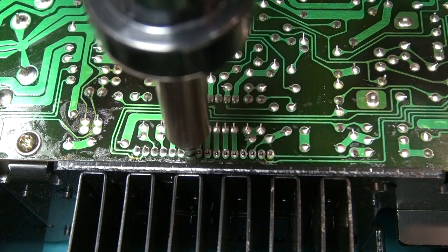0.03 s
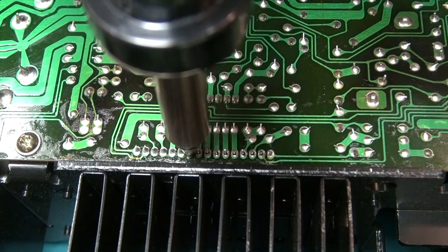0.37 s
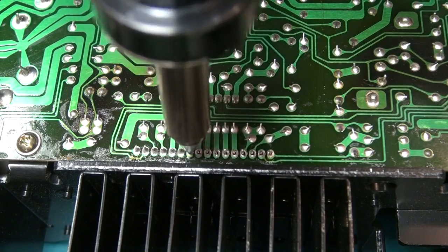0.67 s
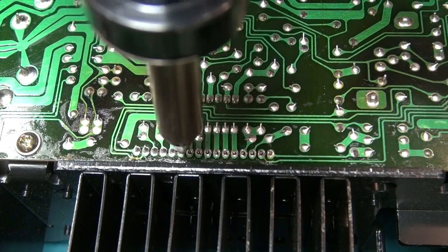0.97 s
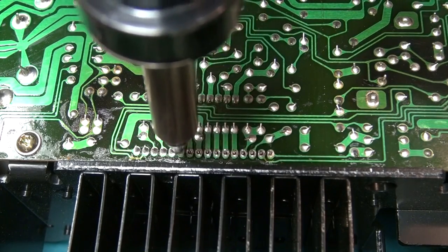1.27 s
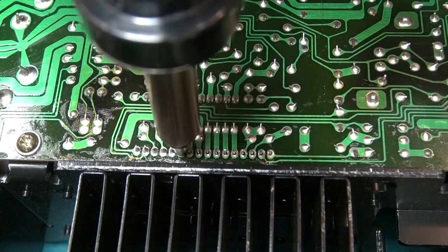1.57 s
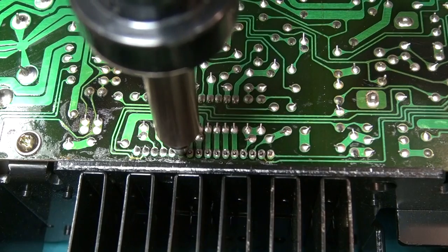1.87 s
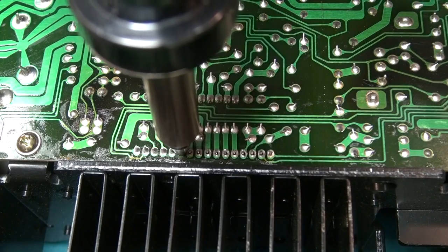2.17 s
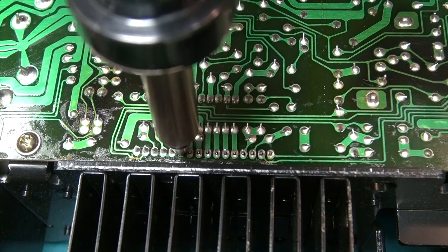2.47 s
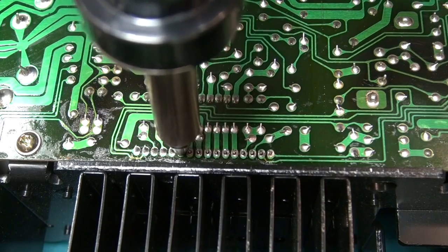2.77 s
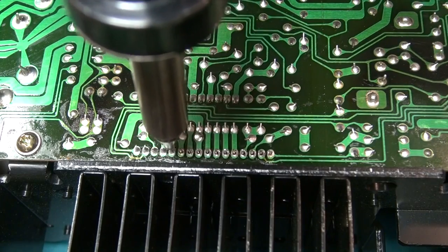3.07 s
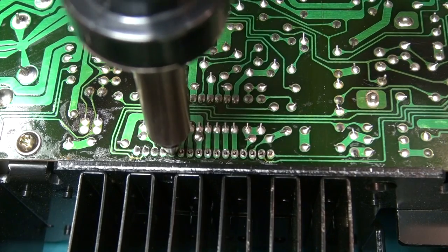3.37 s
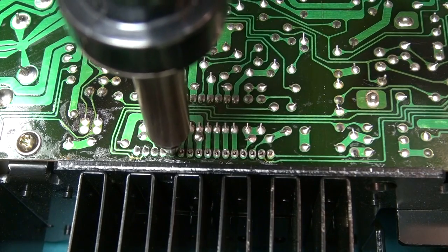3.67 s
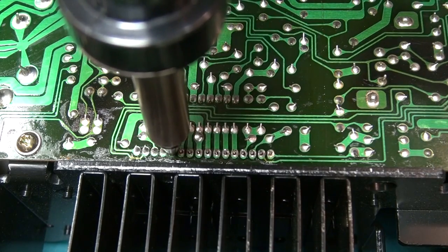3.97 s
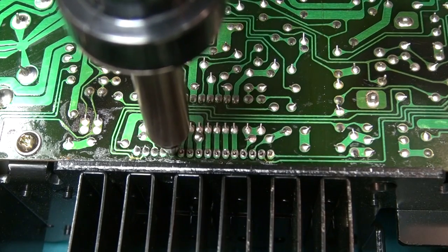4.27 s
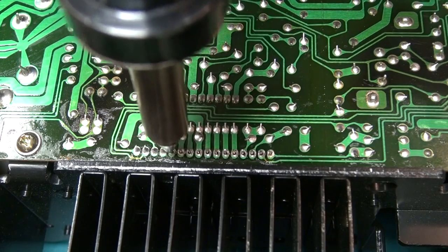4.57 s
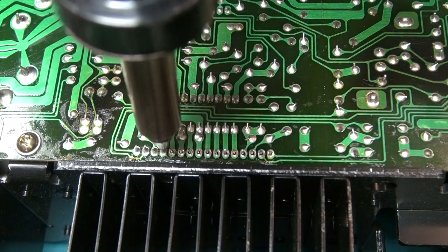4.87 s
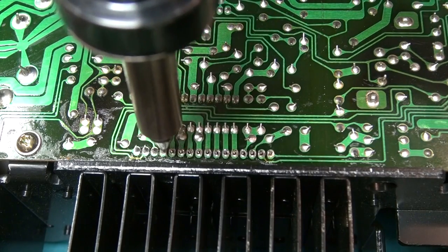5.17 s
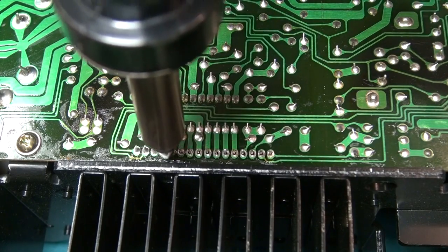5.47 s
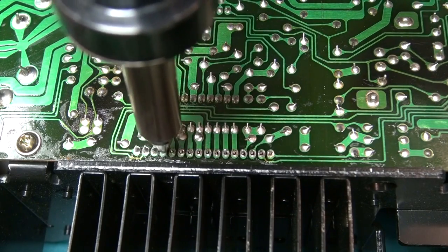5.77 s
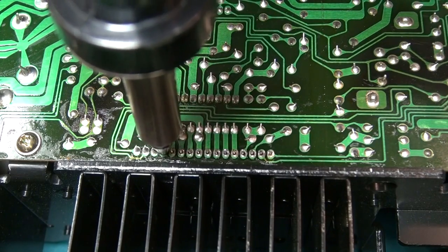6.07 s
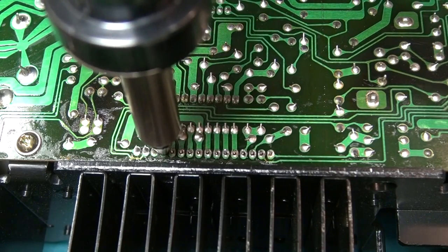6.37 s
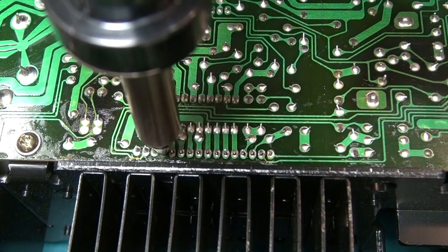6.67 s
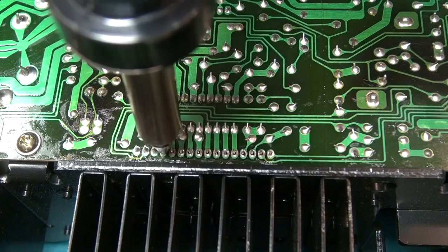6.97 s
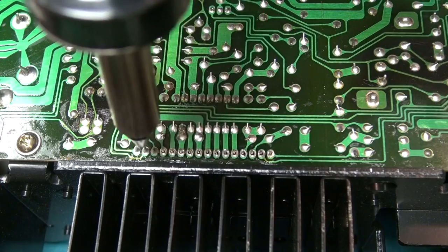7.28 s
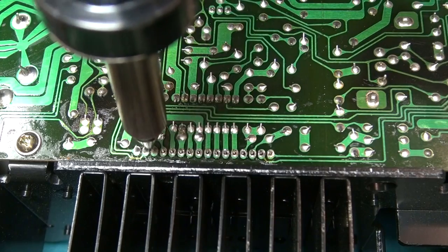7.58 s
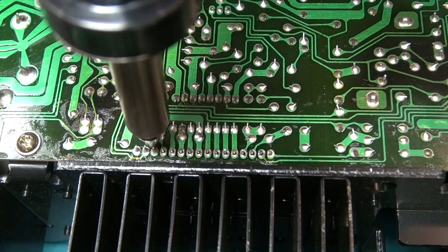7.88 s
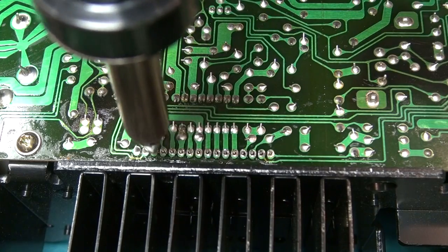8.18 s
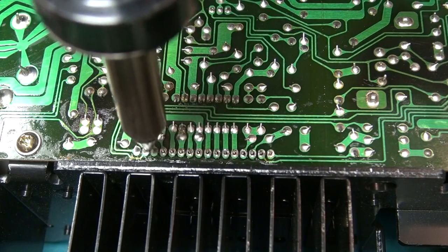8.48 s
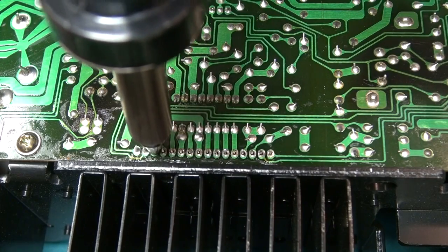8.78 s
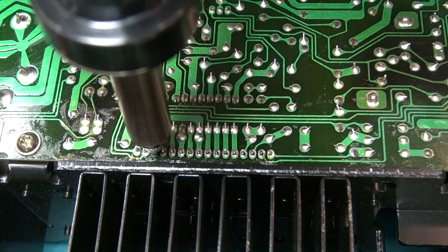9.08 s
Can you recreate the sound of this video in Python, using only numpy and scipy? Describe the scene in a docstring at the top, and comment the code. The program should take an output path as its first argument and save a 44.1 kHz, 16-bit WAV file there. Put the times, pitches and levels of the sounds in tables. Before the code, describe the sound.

A desoldering gun's pump buzzes in four short bursts over a humming fan, its nozzle tapping and scraping on a circuit board.

```python
"""A vacuum desoldering gun works on a circuit board, close up and in stereo, over a humming fan.
The trigger clicks and a diaphragm pump runs up, buzzing, its valves puffing. The nozzle seals and the
pump labours against the vacuum; on release it stops with a last stroke and a faint hiss. Four such
bursts come, near 0.3, 2.4, 4.2 and 6.7 s. Each ducks the gain, which creeps back up while the nozzle
bumps and scrapes from pin to pin. At the end the nozzle slips onto a pin with a hollow knock."""
import sys
import numpy as np
from scipy import signal
from scipy.fft import rfft, irfft
from scipy.io import wavfile
from scipy.ndimage import uniform_filter1d

SR = 44100
rng = np.random.default_rng(int(sys.argv[2]) if len(sys.argv) > 2 else 0)


def inscribe(sig):
    """Save sig as 16-bit PCM at rate SR to the path in sys.argv[1].

    A 1-D sig is mono; a 2-D sig holds one channel per row.
    Samples are clipped to [-1, 1] before scaling.
    """
    pcm = np.round(np.clip(np.atleast_2d(sig).T, -1, 1) * 32767)
    wavfile.write(sys.argv[1], SR, pcm.astype(np.int16))


N = 403068
T = np.arange(N) / SR
FFT_SIZE = 16384
HZ = np.maximum(np.arange(FFT_SIZE // 2 + 1) * SR / FFT_SIZE, 1)


def from_db(db):
    """Decibels to gain."""
    return 10 ** (np.asarray(db) / 20)


def unit_rms(x):
    """Scale to unit power."""
    return x / np.sqrt(np.mean(np.abs(x) ** 2) + 1e-20)


def noise():
    """White noise."""
    return rng.standard_normal(N)


def drift(rate, t=T):
    """A random wobble that glides to a new value rate times a second."""
    return np.interp(t * rate, np.arange(8192), rng.standard_normal(8192))


def over_hz(rows):
    """One curve over log frequency for each column after the first."""
    hz, *columns = np.transpose(rows)
    return [np.interp(np.log(HZ), np.log(hz), column) for column in columns]


def causal(gain):
    """Minimum-phase response with these gains: it rings only after it is struck."""
    cepstrum = irfft(np.log(gain))
    half = len(cepstrum) // 2
    cepstrum[1:half] *= 2
    cepstrum[half + 1:] = 0
    return np.exp(rfft(cepstrum))


def eq(points):
    """Response of an EQ curve drawn through (Hz, dB) points."""
    return causal(from_db(over_hz(points)[0]))


def colour(points):
    """An EQ curve scaled to unit power."""
    return unit_rms(eq(points))


def resonances(modes):
    """Unit-power response of parallel resonators, each (Hz, width in Hz, dB)."""
    return unit_rms(sum((-1) ** k * from_db(db) / (1 + 1j * (HZ ** 2 - hz ** 2) / (HZ * width))
                        for k, (hz, width, db) in enumerate(modes)))


def scatter(decay_s):
    """Unit-power response of dense, dying reflections."""
    return unit_rms(rfft(rng.standard_normal(FFT_SIZE) * np.exp(-T[:FFT_SIZE] / decay_s)))


def through(x, response):
    """Filter a sound with a frequency response."""
    lead = FFT_SIZE // 8
    return signal.oaconvolve(x, np.roll(irfft(response), lead))[lead:lead + N]


def strikes(rows, decay_s):
    """Envelope that jumps at each (s, dB) and dies away."""
    power = np.zeros(N)
    for s, db in rows:
        power[int(s * SR)] += from_db(db) ** 2
    return np.sqrt(signal.lfilter([1], [1, -np.exp(-2 / (decay_s * SR))], power + 1e-18))


def swells(rows):
    """Envelope with a smooth bell at each (centre s, half length s, dB)."""
    out = np.zeros(N)
    for s, half, db in rows:
        near = slice(max(int((s - 3 * half) * SR), 0), int((s + 3 * half) * SR))
        out[near] += from_db(db) * np.exp(-((T[near] - s) / half) ** 2)
    return out


def room(x, wet_db=-22, decay_s=0.034):
    """Stereo reflections of a small, fairly dead workshop."""
    return from_db(wet_db) * np.array([through(x, scatter(decay_s)) for side in range(2)])


# The fan's rush of air. Each row: frequency in Hz, relative level in dB.
FAN_AIR = [(20, -24), (60, -9), (150, -8), (220, -7.5), (500, -9), (850, -6), (1100, -8.5), (2500, -17.5),
           (3600, -22.5), (5300, -23.5), (8000, -33), (10000, -42), (13000, -41.5), (16000, -54)]
# Resonances of its duct. Each row: frequency in Hz, width in Hz, relative level in dB.
FAN_DUCT = [(155, 2.8, -20.5), (348, 40, -0.5), (398, 38, -1), (604, 41, -8), (720.5, 45, -1),
            (771.5, 45, -4)]
# Its motor hum. Each row: frequency in Hz, relative level in dB.
FAN_TONES = [(156.1, -69), (387.6, -63), (721.4, -71), (839.8, -64.5), (1680, -74.5), (2740, -75.5),
             (7160, -107), (11063, -102)]
def fan(air_db=-54, duct_db=-53, tones_db=2, whine_db=-87, whine_hz=11900):
    """The steady bed: rushing air, a resonant duct, motor tones and a thin, wandering whine."""
    def sine(hz):
        return np.sqrt(2) * np.sin(2 * np.pi * np.cumsum(hz) / SR)

    air = from_db(air_db) * through(noise(), colour(FAN_AIR))
    duct = from_db(duct_db) * through(noise(), resonances(FAN_DUCT))
    tones = sum(from_db(db + tones_db) * sine(hz + 1.12 * drift(8)) for hz, db in FAN_TONES)
    whine = from_db(whine_db) * (1 + 0.23 * drift(300)) * sine(whine_hz + 110 * drift(3))
    return air + duct + tones + whine


def fan_hiss(level_db=-68):
    """The part of the fan's hiss that reaches only the left side."""
    tone = colour([(60, -22), (700, 1), (2500, 5.5), (6000, -5), (12000, -14.5), (16000, -50)])
    return from_db(level_db) * through(noise(), tone) * [[1], [0]]


# The nozzle meets pins and board. Each row: start in seconds, thud level in dB, click level in dB.
BUMPS = [(0.085, -74, -55), (1.221, -38.5, -43.5), (1.359, -46, -61), (1.498, -48, -61),
         (3.118, -38.5, -42), (3.311, -43.5, -50.5), (4.144, -65, -55), (4.96, -48, -61), (5.245, -42, -54),
         (5.37, -45, -54), (7.499, -47, -52.5), (7.683, -63, -50.5), (7.816, -44.5, -53),
         (7.955, -48, -51.5), (8.029, -61, -50.5), (8.233, -41, -43), (8.56, -33, -38.5)]
def nozzle_touches(settle_s=0.02723, nudges_per_s=1.5, nudge_db=-62):
    """Rows like BUMPS: each bump, its softer settling, and random nudges from an unsteady hand."""
    settles = [(s + settle_s, thud_db - 9.5, click_db - 16) for s, thud_db, click_db in BUMPS]
    gaps, strengths = rng.random((40, 2)).T
    times = np.cumsum(.5 + gaps) / nudges_per_s
    levels_db = nudge_db + 10 * (strengths - .5)
    nudges = [(s, db, db - 24) for s, db in zip(times, levels_db) if s < T[-1]]
    return BUMPS + settles + nudges


# Low modes of the board in its chassis.
# Each row: frequency in Hz, relative level in dB, seconds to fall by 60 dB.
BOARD_MODES = [(62, -7, 0.33), (94, -5.5, 0.3), (102.7, -4.5, 0.16), (135, -1, 0.35), (165, 2.5, 0.18),
               (214.3, -7.5, 0.3), (287, -5, 0.18)]
def board_thuds(touches, attack_s=0.0051):
    """Each touch sets the board thudding, in a fresh mix of its modes."""
    t = T[:SR // 2]
    attack = 1 - np.exp(-t / attack_s)
    out = np.zeros(N + len(t))
    for s, thud_db, _ in touches:
        ring = np.zeros(len(t))
        for hz, db, t60 in BOARD_MODES:
            fade = from_db(db + rng.normal(0, 1) - 60 * t / t60)
            ring += fade * np.sin(2 * np.pi * (hz * t + rng.random()))
        out[int(s * SR):][:len(t)] += from_db(thud_db) * attack * ring
    return out[:N]


# Tone of a click on a pin. Each row: frequency in Hz, relative level in dB.
PIN_CLICK = [(150, -4), (400, 1.5), (750, 12.5), (1100, -8.5), (1800, -4), (3000, 2.5), (4000, -5.5),
             (5600, -8), (8000, -19), (12000, -28), (16000, -65)]
# Ring of nozzle and pins. Each row: frequency in Hz, width in Hz, relative level in dB.
PIN_RING = [(690, 400, 11), (1560, 69, 14), (1717, 36, 14), (2360, 28, -10), (2740, 100, -13),
            (3100, 170, -3), (5360, 120, -18)]
def pin_clicks(touches, ring_db=-1, tail_db=-8):
    """Metal taps metal: a sharp click with a softer tail and a short ring."""
    hits = [(s, click_db) for s, _, click_db in touches]
    envelope = strikes(hits, decay_s=0.0067) + from_db(tail_db) * strikes(hits, decay_s=0.029)
    return through(envelope * noise(), colour(PIN_CLICK) + from_db(ring_db) * resonances(PIN_RING))


# Slides of the nozzle. Each row: centre in seconds, half length in seconds, level in dB.
SCRAPES = [(3.229, .02, -57.5), (5.42, 0.042, -54), (5.57, .025, -61), (7.84, 0.01, -53.5),
           (7.938, 0.019, -54), (8.035, 0.014, -60)]
# Tone of a slide. Each row: frequency in Hz, relative level in dB.
SCRAPE_TONE = [(600, -4), (1800, 2.5), (3000, 3), (5000, -5), (8000, -9), (12000, -25), (16000, -40)]
def solder_scrapes():
    """The nozzle drags over solder with a gritty hiss."""
    grit = noise() * from_db(3 * drift(400))
    return through(swells(SCRAPES) * grit, colour(SCRAPE_TONE))


# The closing knock. Each row: start in seconds, level in dB.
SLIP = [(8.626, -30)]
# Its hollow ring. Each row: frequency in Hz, width in Hz, relative level in dB.
SLIP_RING = [(855, 170, 6.5), (1500, 190, 3.5), (1760, 90, -3), (2240, 160, -1), (3370, 630, -16),
             (5700, 220, -11.5), (8050, 550, -22.5)]
def nozzle_slip():
    """The nozzle slips onto a pin with one hard, hollow knock."""
    return through(strikes(SLIP, decay_s=0.0073) * noise(), resonances(SLIP_RING))


# Cues for trigger and pump. Each row: press, nozzle seal, release and motor stop in seconds,
# free crank speed in turns a second, run-up time constant in seconds,
# relative levels of the trigger and of the last stroke in dB.
BURSTS = [(.2747, .4662, .5872, .598, 67, .033, -24.5, -24),
          (2.421, 2.5991, 2.7222, 2.731, 67, .058, -26.5, -21),
          (4.1801, 4.3583, 4.5386, 4.547, 66.6, .056, -28, -23),
          (6.7277, 6.9066, 7.0205, 7.037, 66.8, .056, -27, -24)]
# Resonances of the switch.
# Each row: frequency in Hz, width in Hz, relative levels in dB on closing and on opening.
SWITCH_MODES = [(2500, 520, -3.5, -8), (3630, 300, -1, -1.5), (4720, 300, 3.5, -51), (5640, 470, -3, 0.5),
                (6350, 270, -0.5, 1), (7350, 270, -1, -7), (8670, 960, -21, -16), (12000, 780, -20, -32)]
def trigger(snap_db=8, chatter_db=-12, take_up_s=.013, take_up_db=-26):
    """The lever touches the switch, which snaps shut and chatters; it opens with a different ring."""
    presses = [(on, db) for on, *_, db, last_db in BURSTS]
    presses += [(s - take_up_s, db + take_up_db) for s, db in presses]
    releases = [(off, db) for on, sealed, off, *_, db, last_db in BURSTS]
    spring_chatter = from_db(chatter_db) * strikes(presses, decay_s=0.0056)
    closing = (strikes(presses, decay_s=0.00064) + spring_chatter) * noise()
    opening = strikes(releases, decay_s=0.0022) * noise()
    closing_ring = resonances([(hz, width, db) for hz, width, db, _ in SWITCH_MODES])
    opening_ring = resonances([(hz, width, db) for hz, width, _, db in SWITCH_MODES])
    grip = eq([(8000, -1.5), (13000, -3), (15000, -20)])   # the handle muffles the very top
    clicks = through(closing, grip * closing_ring) + through(opening, grip * opening_ring)
    return from_db(snap_db) * clicks


def crank_motion(start_lag_hz=25.85, vacuum_sag_hz=8.3, sag_s=.05, run_down_s=.07, seal_s=0.063):
    """The motor runs up, sags under vacuum and runs down: angle in turns; drive, vacuum, pace 0-1."""
    turns, drive, vacuum, pace = np.zeros((4, N))
    for on, sealed, off, stop, free_hz, run_up_s, *_ in BURSTS:
        now = T >= on
        t = T[now]
        since_stop = np.clip(t - stop, 0, 1)
        coasting = np.exp(-since_stop / run_down_s)
        unloaded_hz = free_hz - start_lag_hz * np.exp(-(t - on) / run_up_s)
        load = 1 - np.exp(-np.maximum(t - sealed, 0) / sag_s)
        angle = np.cumsum((unloaded_hz - vacuum_sag_hz * load) * coasting) / SR
        turns[now] = angle - np.interp(sealed, t, angle)   # the nozzle seals at the top of a stroke
        pace[now] = coasting * unloaded_hz / free_hz   # share of full speed, leaving out the sag
        fade_in = np.clip((t - on - 0.0027) / 0.027, 0, 1)
        brake = np.exp(-since_stop / 0.0074)
        coast_tail = from_db(-22) * np.exp(-since_stop / 0.08)
        drive[now] = fade_in * np.maximum(brake, coast_tail)
        vacuum[now] = np.clip((t - sealed) / seal_s + .5, 0, 1)
    return turns, drive, vacuum, pace


def crank_grain(turns, count=64, per_turn=720):
    """Noise tied to the crank: each turn keeps most of the grain of the one before."""
    grain = signal.lfilter([.5], [1, -.87], rng.standard_normal((count, per_turn)), axis=0).ravel()
    return grain[((turns + count / 2) * per_turn).astype(int) % len(grain)]


def each_turn(hits, turns, vacuum, rise_turns, decay_turns, repeat, uneven_db):
    """Noise bursts at (crank angle, free-air dB, vacuum dB); more of the grain repeats under vacuum."""
    angle = np.arange(720) / 720
    free, sealed = 0, 0
    for at, free_db, vacuum_db in hits:
        age = (angle - at) % 1
        shape = (np.minimum(age / rise_turns, 1) * np.exp(-age / decay_turns)) ** 2
        free += shape * from_db(free_db) ** 2
        sealed += shape * from_db(vacuum_db) ** 2
    crank = turns % 1
    power = (1 - vacuum) * np.interp(crank, angle, free) + vacuum * np.interp(crank, angle, sealed)
    share = np.clip(repeat * (1 + vacuum) / 2, 0, 1)
    grain = np.sqrt(share) * crank_grain(turns) + np.sqrt(1 - share) * noise()
    return np.sqrt(power) * grain * from_db(uneven_db * drift(120))


# Valve flap ticks. Each row: crank angle in turns, relative dB in free air and under vacuum.
FLAP_TICKS = [(.25, -45, -42), (.58, -44, -42), (.95, -42, -39)]
# Their bright tone. Each row: frequency in Hz, relative level in dB.
FLAP_TONE = [(2000, -3), (5000, -4), (8000, -1), (9500, -7.5), (11000, -10), (12500, -12.5), (14000, -40),
             (16000, -48)]
def valve_flaps(turns, drive, vacuum):
    """The flaps tick on every turn; just after release the vacuum lets go with a hiss."""
    ticks = each_turn(FLAP_TICKS, turns, vacuum,
                      rise_turns=.014, decay_turns=.23, repeat=.54, uneven_db=1)
    leak = swells([(off + 0.088, .045, -64) for on, sealed, off, *_ in BURSTS]) * noise()
    return through(drive * ticks + leak, colour(FLAP_TONE))


# Valve puffs. Each row: crank angle in turns, relative dB in free air and under vacuum.
PUFFS = [(.01, -30.5, -64), (.29, -27, -68), (.9, -55, -85)]
# Their breathy tone. Each row: frequency in Hz, relative level in dB.
PUFF_TONE = [(1000, -11), (2000, -17), (3000, -37), (3900, -7), (4550, 4), (5100, -0.5), (5600, 0),
             (6200, -10), (7600, -13.5), (10000, -26), (13000, -45), (16000, -57)]
def valve_puffs(turns, drive, vacuum):
    """Air puffs through the valves, and all but vanishes once the nozzle seals."""
    puffs = each_turn(PUFFS, turns, vacuum, rise_turns=.096, decay_turns=.12, repeat=.5, uneven_db=5.5)
    return through(drive * puffs, colour(PUFF_TONE))


# Resonances of the pump chamber. Each row: frequency in Hz, width in Hz, relative level in dB.
CHAMBER_MODES = [(193, 42, -9), (490, 82, 3.5), (600, 88, 0.5), (707, 61, 1), (813, 75, 4.5),
                 (986, 89, 4.5)]
def chamber_churn(turns, drive, vacuum):
    """Air churns in the chamber once a turn, more softly under vacuum."""
    churn = each_turn([(.95, -23.5, -31.5)], turns, vacuum,
                      rise_turns=.037, decay_turns=.48, repeat=0, uneven_db=0)
    return through(drive * churn, resonances(CHAMBER_MODES))


def start_hits(db, decay_s, delay_s=.015):
    """A burst of noise as the motor starts, just after each press."""
    return strikes([(on + delay_s, db) for on, *_ in BURSTS], decay_s) * noise()


def last_strokes(rock_back_s=.026, rock_back_db=-1.5):
    """A double hit at each stop: the crank gives one more stroke, then rocks back."""
    strokes = [(stop, db) for on, sealed, off, stop, *_, db in BURSTS]
    rebounds = [(s + rock_back_s, db + rock_back_db) for s, db in strokes]
    return strikes(strokes + rebounds, decay_s=0.0043) * noise()


def motor_kick(stop_hits):
    """The motor jolts the whole gun as it starts and as it stops."""
    body = resonances([(196, 120, -4.5), (520, 150, 2.5), (621, 31, 4.5)])
    return through(start_hits(db=-33, decay_s=0.011) + stop_hits, body)


# Linkage knocks. Each row: crank angle in turns, relative dB in free air and under vacuum.
KNOCKS = [(.16, -23.5, -35), (.28, -35.5, -33), (.71, -24, -32.5), (.92, -47, -26.5), (.99, -29, -20)]
# Resonances of the gun's housing. Each row: frequency in Hz, width in Hz, relative level in dB.
HOUSING_MODES = [(1273, 120, -4.5), (1520, 120, -1), (1794, 166, -0.5), (2024, 113, 1), (2292, 140, -1),
                 (2770, 560, -11.5), (3290, 248, -5.5), (5550, 1400, -21.5)]
def linkage_rattle(turns, drive, vacuum, stop_hits):
    """The linkage clacks as it takes up its slack, then knocks the housing until the last stroke."""
    clack = start_hits(db=-25, decay_s=0.002)
    knocks = each_turn(KNOCKS, turns, vacuum, rise_turns=.04, decay_turns=.22, repeat=.65, uneven_db=.3)
    housing = resonances(HOUSING_MODES) * eq([(6000, -2), (13000, -23), (15000, -28)])
    return through(clack + drive * knocks + from_db(-7.5) * stop_hits, housing)


# Harmonics of the pump body.
# Each row: multiple of the crank speed, relative dB in free air and under vacuum.
BUZZ_HARMONICS = [(1, -54.5, -46), (2, -50, -46), (3, -43.5, -43.5), (4, -42.5, -37.5), (5, -42, -42.5),
                  (6, -46, -61), (7, -59, -41.5), (8, -33.5, -27.5), (9, -38, -41.5), (10, -61, -35.5),
                  (11, -38, -47.5), (12, -39, -41), (13, -40, -45), (14, -46, -41.5), (15, -65, -57),
                  (16, -41.5, -34.5), (17, -58, -36), (18, -61, -43.5), (19, -67, -50), (20, -47, -44)]
def body_buzz(turns, drive, vacuum, lead_turns=0.025, free_rough=0.083, vacuum_rough=.1):
    """Each stroke shoves the body, which rings on until the next; every harmonic flutters a little."""
    multiples, free_db, vacuum_db = np.transpose(BUZZ_HARMONICS)
    phases = np.angle(causal(from_db(np.r_[free_db.min(), vacuum_db, free_db.min()])))[1:-1]
    running = drive > 1e-4
    crank, load, t = turns[running] + lead_turns, vacuum[running], T[running]
    roughness = free_rough + (vacuum_rough - free_rough) * load
    out = np.zeros(N)
    for k, free, sealed, phase in zip(multiples, from_db(free_db), from_db(vacuum_db), phases):
        gain = free + (sealed - free) * load
        flutter = 1 + roughness * drift(60, t)
        out[running] -= gain * flutter * np.cos(2 * np.pi * k * crank + phase)
    return np.sqrt(2) * drive * out


def pump():
    """The diaphragm pump: one crank drives the buzz, the rattle and the moving air."""
    turns, drive, vacuum, pace = crank_motion()
    stop_hits = last_strokes()
    buzz = body_buzz(turns, drive * pace ** 2, vacuum)   # shaking grows with the square of the speed
    rattle = linkage_rattle(turns, drive, vacuum, stop_hits)
    valves = valve_puffs(turns, drive, vacuum) + valve_flaps(turns, drive, vacuum)
    return buzz + rattle + valves + chamber_churn(turns, drive, vacuum) + motor_kick(stop_hits)


# Stereo images of the gun and of the bench sounds, left side against right.
# Each row: frequency in Hz, level in dB, phase lead in radians, likeness from 0 to 1.
GUN_IMAGE = [(56.3, -4, -0.4, .99), (123, -4, -0.8, 0.9), (320, -2, -1.92, 0.94), (536, -3.5, -2.5, 0.96),
             (713, -3, -2.5, 1), (894, -2.5, -3.5, 0.9), (1180, -4, -3, 0.95), (1990, -3, -3, 0.96),
             (2660, -8, -3.5, 0.7), (4500, -11.5, -3.4, 0.8), (6500, -9.5, -1.5, 0.43),
             (10200, 0.5, 0, 0.35), (14500, -12, -3.5, 0.6)]
BENCH_IMAGE = [(60, -19, -0.4, 1), (216, -13, 2, 1), (395, -14.5, -2, 0.41), (714, -9, -2, 0.97),
               (990, -3, -2.5, 0.96), (2400, -5, -2, 0.82), (5600, -9, -1.5, 1), (7640, -5, -1, 0.67),
               (14700, -12, 0, 1)]
def stereo(x, image):
    """The right side faces the work; the left is weaker, phase-shifted and scattered by the bench."""
    level_db, lead, likeness = over_hz(image)
    likeness = np.clip(likeness, 0, 1)
    direct = likeness * np.exp(1j * lead)
    scattered = np.sqrt(1 - likeness ** 2) * scatter(decay_s=.016)
    left = through(x, from_db(level_db) * (direct + scattered))
    return np.array([left, x])


def scene(pump_db=4):
    """The mix: the gun up front, the board under it, the fan behind, and a touch of room."""
    gun = from_db(pump_db) * pump() + trigger()
    touches = nozzle_touches()
    board = board_thuds(touches) + pin_clicks(touches) + solder_scrapes() + nozzle_slip()
    return stereo(gun, GUN_IMAGE) + stereo(board + fan(), BENCH_IMAGE) + room(gun + board) + fan_hiss()


def record(dry, threshold_db=-25, release_db_per_s=4.0, attack_s=0.0036, cutoff_hz=15650):
    """Gain control, keyed by the right side, ducks fast and recovers slowly; a low-pass cuts the top."""
    power = uniform_filter1d(dry[1] ** 2, size=1400)
    over_db = np.maximum(10 * np.log10(np.maximum(power, 1e-12)) - threshold_db, 0)
    held_db = np.maximum.accumulate(over_db + release_db_per_s * T) - release_db_per_s * T
    pole = np.exp(-1 / (attack_s * SR))
    duck_db = signal.lfilter([1 - pole], [1, -pole], held_db)
    low_pass = signal.ellip(12, .1, 70, cutoff_hz, fs=SR, output="sos")
    return signal.sosfilt(low_pass, dry * from_db(-duck_db))


dry = scene()
out = record(dry)
inscribe(out)
```